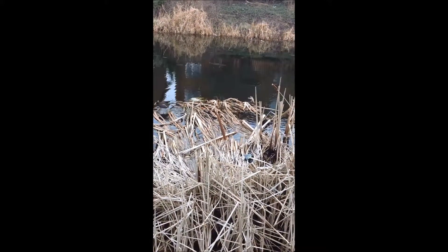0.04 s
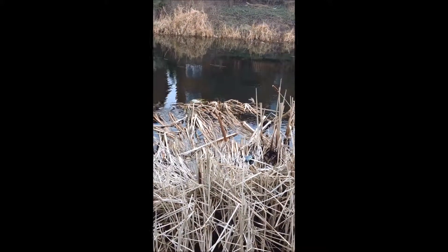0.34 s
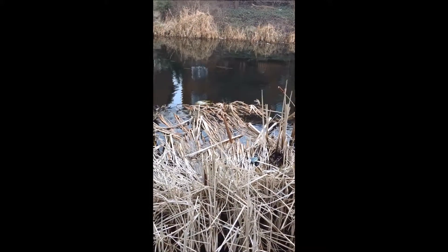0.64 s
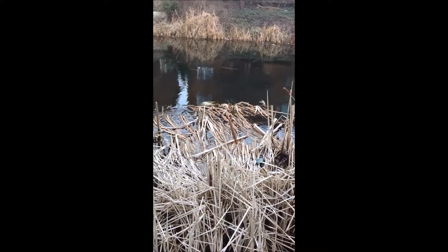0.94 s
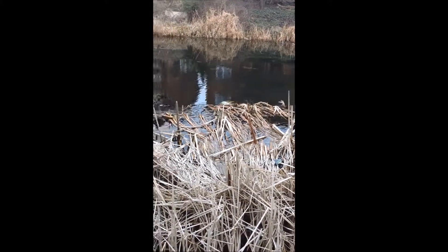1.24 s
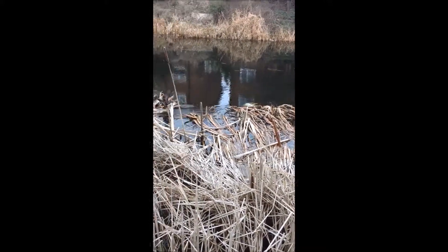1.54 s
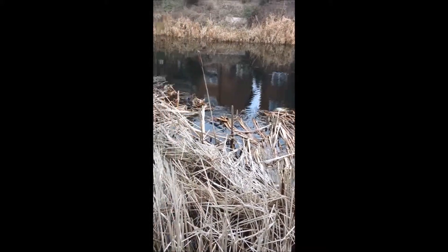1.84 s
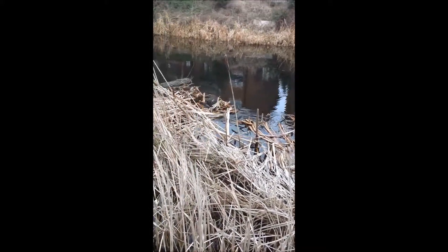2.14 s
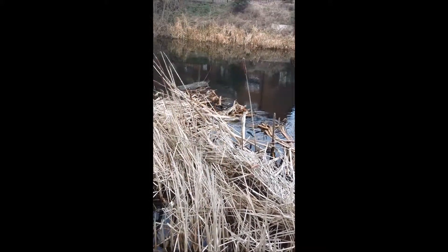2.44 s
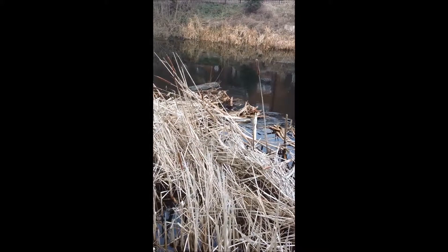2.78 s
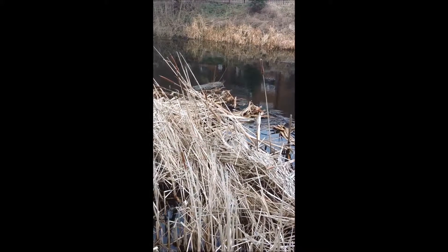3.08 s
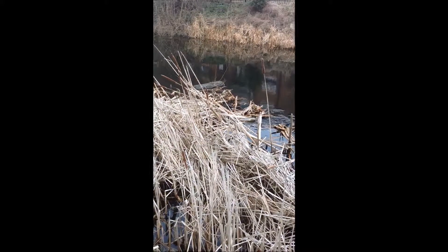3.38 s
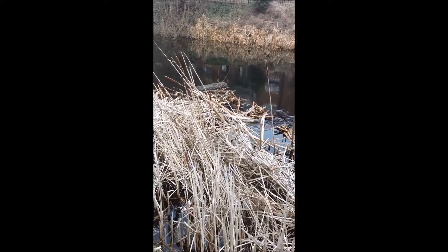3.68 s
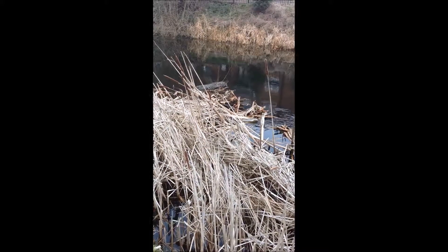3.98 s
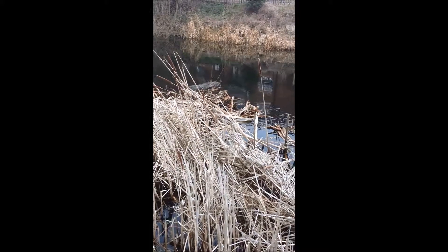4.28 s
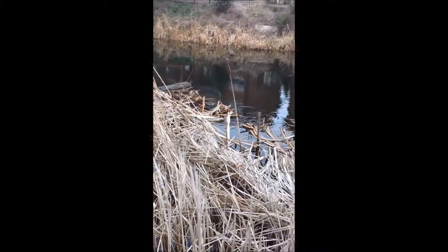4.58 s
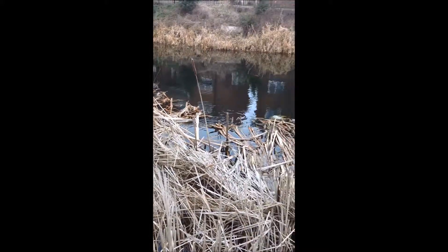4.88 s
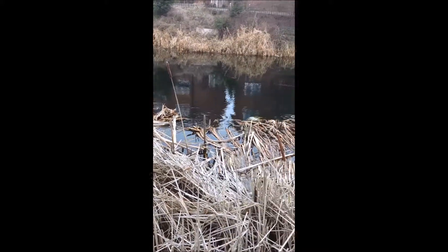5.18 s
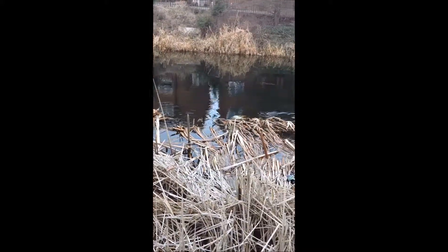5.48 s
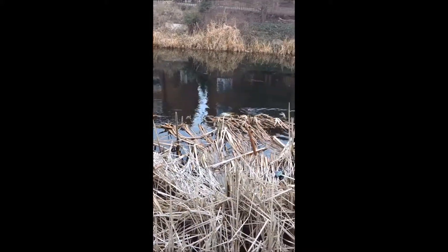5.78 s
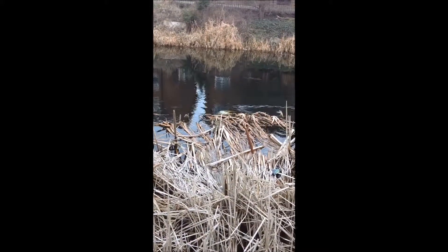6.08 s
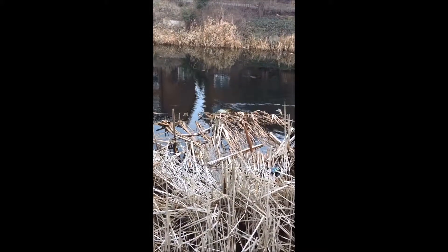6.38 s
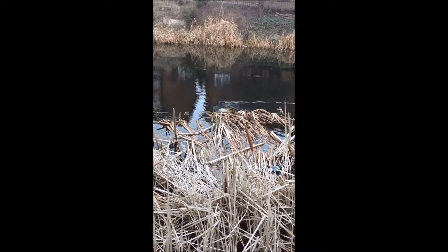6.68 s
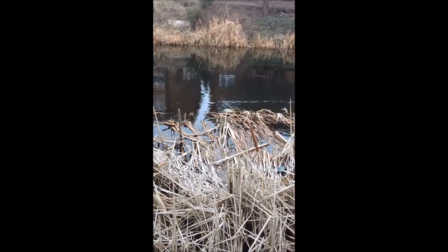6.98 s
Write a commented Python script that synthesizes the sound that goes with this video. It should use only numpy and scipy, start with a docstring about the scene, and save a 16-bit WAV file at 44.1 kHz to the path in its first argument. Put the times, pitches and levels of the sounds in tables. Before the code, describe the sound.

Wind buffets the microphone in low gusts while a small bird repeats a high whistle and other birds twitter faintly.

```python
"""A small bird, probably a tit, repeats a buzzing whistle on the reedy bank of a canal: a frequency-
modulated tone, with a faint high note after it. Songbirds twitter in gliding tones, dry reeds
tick, and a waterbird like a coot clucks three times through its throat resonances; the banks scatter
the calls back. Turbulent gusts buffet the hand-held microphone over the hum of a distant town."""
import sys
import numpy as np
from scipy import signal
from scipy.fft import rfft, irfft
from scipy.io import wavfile
from scipy.ndimage import uniform_filter1d

SR = 44100
rng = np.random.default_rng(int(sys.argv[2]) if len(sys.argv) > 2 else 0)


def store_wav(level_fs):
    """Save 16-bit WAV to argv[1]."""
    pcm = np.round(np.clip(np.atleast_2d(level_fs), -1, 1) * 32767)
    wavfile.write(sys.argv[1], SR, pcm.T.astype(np.int16))


N = 314433
TIME = np.arange(N) / SR


def undb(db):
    """Decibels to amplitude ratio."""
    return 10 ** (np.asarray(db) / 20)


def unit(x):
    """Normalisation to rms 1."""
    return x / np.sqrt(np.mean(x ** 2))


def add(track, start_s, sound):
    """Superposition: a sound sums into a track from start_s on."""
    i = max(int(start_s * SR), 0)
    track[i:i + len(sound)] += sound[:N - i]


def noise(spectrum, size=N):
    """Spectral shaping: noise of rms 1 that follows (frequency_hz, level_db) points."""
    hz, db = np.transpose(spectrum)
    bins_hz = np.maximum(np.fft.rfftfreq(size, 1 / SR), 1)
    gain = undb(np.interp(np.log(bins_hz), np.log(hz), db))
    return unit(irfft(rfft(rng.standard_normal(size)) * gain, size))


def drift(rate_hz, size=N):
    """Linear interpolation of random values: a smooth drift with a spread near 1."""
    hold = int(SR / rate_hz)
    steps = np.repeat(rng.standard_normal(size // hold + 2), hold)
    return uniform_filter1d(steps, hold)[:size] * np.sqrt(3 / 2)


def band(x, low_hz, high_hz, order=2):
    """Butterworth band-pass filtering."""
    return signal.sosfilt(signal.butter(order, [low_hz, high_hz], "band", fs=SR, output="sos"), x)


def phase_of(hz):
    """Phase is the time integral of frequency."""
    return 2 * np.pi * np.cumsum(hz) / SR


def note(length_s, edge):
    """Progress u from 0 to 1, and a raised-cosine envelope whose two ramps each take the share edge."""
    u = np.linspace(0, 1, int(length_s * SR))
    return u, np.sin(np.pi / 2 * np.clip(np.minimum(u, 1 - u) / edge, 0, 1)) ** 2


def whistle(length_s, hz, scoop_hz, buzz_hz=226, buzz_index=0.33, flutter=0.17, waver_hz=9):
    """Frequency modulation: a fast buzz in the syrinx puts sidebands on a tone scooping to its pitch."""
    u, swell = note(length_s, edge=0.33)
    buzz = np.sin(phase_of(buzz_hz * (1 + 0.078 * drift(110, len(u)))))
    pitch_hz = hz - scoop_hz * (1 - u) ** 3 + waver_hz * drift(118, len(u))
    # a note that starts low also starts buzzy, and clears on arrival
    index = buzz_index + scoop_hz / 125 * np.exp(-u / 0.23)
    tone = unit(np.sin(phase_of(pitch_hz) + index * buzz))
    return swell ** 0.47 * (1 + flutter * drift(95, len(u))) * tone


def tit(song_db=-47, echo_db=-14, echo_s=.078, high_after_s=.123, high_ratio=1.282, high_db=-64.5):
    """Multipath propagation: the whistle's direct path fades and swells while its echoes stay even."""
    # the repeated whistle: start_s, length_s, pitch_hz, scoop_from_below_hz, direct_level_db
    whistles = [(0, 0.059, 4140, 61, -48), (0.272, 0.081, 4150, 125, -52.5), (.56, 0.076, 4140, 128, -52),
                (3.836, 0.085, 4200, 21, -45), (4.112, 0.089, 4222, 58, -44),
                (4.389, 0.097, 4200, -7, -41.5), (4.676, .11, 4177, 8, -46), (4.959, 0.1, 4157, 115, -54.5),
                (5.246, .082, 4156, 83, -49.5), (5.511, 0.086, 4160, 142, -46.5),
                (5.789, .1, 4156, 94, -47.5), (6.077, 0.087, 4180, 170, -45.5),
                (6.364, 0.098, 4168, 19, -46)]
    direct, wall_echo, sung, high = np.zeros((4, N))
    for start_s, length_s, hz, scoop_hz, db in whistles:
        tone = whistle(length_s, hz, scoop_hz)
        add(direct, start_s, undb(db) * tone)
        add(sung, start_s, undb(song_db) * tone)
        add(wall_echo, start_s + echo_s, undb(song_db + echo_db) * tone)
        # a thin high note follows the whistle
        u, swell = note(0.055, edge=0.12)
        thin = unit(np.sin(phase_of(high_ratio * hz + 70 * (.5 - u) + 28 * drift(300, len(u)))))
        add(high, start_s + high_after_s, undb(high_db + 1.5 * rng.standard_normal()) * swell * thin)
    scattered = banks(sung, near_db=-10, far_db=-9, t60_s=0.83)
    scattered += banks(high, near_db=-4.5, far_db=0.5, t60_s=0.65)
    return direct + wall_echo + high + scattered


def banks(x, near_db, far_db, t60_s, near_s=0.012):
    """Scattering: near stalks answer at once; trees and walls across the water return a long tail."""
    t = TIME[:SR]
    near, far = rng.standard_normal((2, SR))
    near = near * np.exp(-t / near_s)
    far = far * undb(-60 * t / t60_s) * (1 - np.exp(-t / 0.07))
    response = undb(near_db) * unit(near) + undb(far_db) * unit(far)
    return signal.fftconvolve(x, response / np.sqrt(SR))[:N]


def chirp(length_s, start_hz, middle_hz, end_hz, flutter_db=1.5):
    """Frequency sweep: a nearly pure tone arches through three pitches, weaker on its flanks."""
    u, swell = note(length_s, edge=0.034)
    arch = 1 - np.abs(2 * u - 1) ** 2.6
    pitch_hz = start_hz + (end_hz - start_hz) * u + (middle_hz - (start_hz + end_hz) / 2) * arch
    waver_hz = 16 + .055 * np.ptp(pitch_hz)  # wide slides waver more
    tone = unit(np.sin(phase_of(pitch_hz + waver_hz * drift(300, len(u)))))
    return swell * (0.52 + 0.37 * arch) * undb(flutter_db * drift(150, len(u))) * tone


def chorus(count=170, spread=0.13, droop=.08, direct_db=-6):
    """Reverberant field: random, mostly falling chirps of far birds arrive largely as echoes."""
    # the course of the far chorus: time_s, level_db, centre_pitch_hz
    contour = [(0, -82, 5500), (.75, -61.5, 4840), (1.0, -70.5, 4470), (1.4, -64.5, 5030),
               (2.0, -71.5, 3950), (2.3, -63.5, 3920), (2.7, -75, 4940), (3.3, -78, 4070),
               (3.7, -65.5, 5380), (4.9, -63.5, 4690), (6.4, -82, 4310), (6.8, -67.5, 3370),
               (7.13, -77, 3350)]
    times_s, level_db, centre_hz = np.transpose(contour)
    out = np.zeros(N)
    for k, (offset, stretch, *bends) in enumerate(rng.random((count, 5))):
        start_s = (k + offset) / count * TIME[-1]
        shape = 1 + spread * (2 * np.array(bends) - 1) + droop * np.array([1, 0, -1])
        pitches_hz = np.interp(start_s, times_s, centre_hz) * shape
        gain = undb(np.interp(start_s, times_s, level_db))
        add(out, start_s, gain * chirp(.02 + 0.02 * stretch, *pitches_hz))
    return undb(direct_db) * out + banks(out, near_db=-6.0, far_db=-5.5, t60_s=0.34)


def wind_level(steady_gain_db=1.5, attack_s=.012, release_s=0.0087):
    """Incoherent addition: the powers of steady flow and brief puffs sum to the wind's level in dB."""
    # the steady wind, with one long gust: time_s, level_db
    steady = [(0.0, -42), (0.26, -43), (0.48, -49), (0.71, -51), (1.01, -47), (1.17, -53), (1.41, -51),
              (1.57, -40.5), (1.87, -41), (2.52, -53), (2.8, -42.5), (3.16, -23.5), (3.45, -21.5),
              (3.55, -26), (3.73, -37), (3.93, -38), (4.11, -52.5), (4.31, -48), (4.53, -41), (4.69, -55.5),
              (5.14, -49.5), (6.31, -54), (6.79, -50.5), (7.13, -53.5)]
    # separate puffs on top of it: start_s, length_s, level_db
    puffs = [(0.048, 0.042, -35.5), (.17, 0.04, -26), (0.227, 0.037, -20), (0.289, 0.04, -31.5),
             (.338, 0.038, -25), (0.434, 0.031, -31.5), (0.6, 0.02, -36), (.67, 0.017, -42),
             (0.816, 0.068, -41), (0.922, 0.14, -37), (1.06, 0.076, -31), (1.376, 0.038, -38.5),
             (1.71, 0.063, -41), (1.908, 0.14, -35), (2.183, 0.056, -34), (2.25, 0.08, -44),
             (2.446, 0.17, -35), (2.768, 0.18, -38), (2.919, 0.035, -25.5), (3.565, .08, -21),
             (3.938, 0.077, -27), (4.076, 0.063, -38), (4.3, .1, -28), (4.672, 0.061, -36.5),
             (4.862, 0.17, -46.5), (5.148, .045, -33.5), (5.28, 0.017, -39.5), (5.407, .15, -34),
             (5.675, 0.033, -38), (6.171, 0.044, -42), (6.726, 0.075, -36), (6.866, 0.059, -31)]
    power = undb(np.interp(TIME, *np.transpose(steady)) + steady_gain_db) ** 2
    for start_s, length_s, db in puffs:
        rise = np.clip((TIME - start_s) / attack_s + .5, 0, 1)
        release = np.exp(-np.clip(TIME - start_s - length_s, 0, 1) / release_s)
        power = power + (undb(db) * rise * release) ** 2
    return 10 * np.log10(power)


def wind(gale_from_db=-30, transition_db=2.0):
    """Turbulence: light air only rumbles; a strong gust breaks into smaller, brighter eddies."""
    # spectrum of light air: frequency_hz, level_db
    breeze = [(15, -62.5), (25, -35.5), (38, -37.5), (105, -4.5), (171, 3), (246, -8.5), (450, -31.5),
              (580, -45.5), (990, -120)]
    # spectrum of a strong gust: frequency_hz, level_db
    gale = [(15, -69), (25, -54), (54, -44), (101, -18.5), (139, -2), (189, 4), (257, -1.5), (299, -4),
            (552, -21.5), (584, -24.5), (763, -30), (2400, -81), (3120, -96.5), (5280, -120)]
    gust_db = wind_level()
    gale_share = 1 / (1 + np.exp((gale_from_db - gust_db) / transition_db))
    flow = np.sqrt(1 - gale_share) * noise(breeze) + np.sqrt(gale_share) * band(noise(gale), 55, 800)
    # the gust sets the rms pressure; eddies only flutter around it
    flow = flow * undb(4.0 * drift(70))
    flow = flow / np.sqrt(uniform_filter1d(flow ** 2, int(.05 * SR)))
    return band(flow * undb(gust_db), 45, 3500)


def town(level_db=-56):
    """Broadband background noise: a far-off hum whose level drifts a little."""
    # spectrum of the distant town and the hiss of the air: frequency_hz, level_db
    hum = [(25, -31), (45, -16), (70, -8), (150, -4), (300, 2.5), (480, -4.5), (850, -1), (1300, -8),
           (2000, -15), (2800, -19.5), (5000, -23), (7000, -27.5), (10000, -35.5), (13000, -33),
           (15000, -30)]
    return noise(hum) * undb(level_db + .5 * drift(1.8))


def buffets(thump_gain_db=-2, cycles=0.84, onset_power=1.53, edge_gain_db=9, edge_s=0.0027):
    """Step response: the microphone's bass cut turns each eddy's pressure step into a swing or two."""
    # the hardest eddies: start_s, thump_level_db, nominal_pitch_hz, leading_edge_level_db
    eddies = [(.056, -19.5, 194, -58), (.231, -10.5, 217, -55), (.241, -13.5, 283, -53),
              (.351, -19, 180, -36), (0.996, -22, 157, -66), (1.525, -22.5, 188, -59),
              (2.982, -24.5, 210, -46), (3.007, -11.5, 238, -38), (3.025, -8, 226, -40),
              (3.054, -11.5, 201, -35.5), (3.082, -19, 155, -41.5), (3.136, -6, 236, -44),
              (3.216, -22, 240, -48), (3.267, -10.5, 337, -29), (3.28, -9.5, 209, -25.5),
              (3.29, -13, 240, -24.5), (3.352, -13, 260, -33), (3.381, -11.5, 160, -31.5),
              (3.426, -8.5, 220, -35.5), (3.438, -8.5, 240, -34), (3.476, -12, 280, -31),
              (3.518, -9.5, 185, -52), (3.568, -13, 175, -30.5), (3.583, -9.5, 213, -40),
              (3.631, -19, 206, -43), (3.642, -4.5, 225, -43), (3.678, -16, 155, -46.5),
              (3.746, -18, 293, -42), (3.756, -15, 180, -46), (3.957, -16.5, 170, -45),
              (3.988, -30, 215, -38.5), (4.311, -18.5, 266, -62), (4.384, -16, 174, -47),
              (5.515, -16.5, 168, -58), (5.63, -23.5, 180, -67), (6.002, -28, 230, -58),
              (6.287, -28.5, 175, -48.5), (6.544, -18, 173, -53), (6.873, -19, 263, -50),
              (6.903, -13.5, 206, -54)]
    thumps, edges = np.zeros((2, N))
    t = TIME[:2048]
    for start_s, thump_db, hz, edge_db in eddies:
        age = t * hz / cycles
        pitch_hz = hz * (0.77 + 0.86 * np.exp(-age))  # the swing slows as the eddy passes
        swing = age ** onset_power * np.exp(-2 * age) * np.sin(phase_of(pitch_hz))
        add(thumps, start_s, undb(thump_db + thump_gain_db) * swing / np.abs(swing).max())
        edge = band(rng.standard_normal(len(t)) * t * np.exp(-t / edge_s), 350, 685)
        add(edges, start_s, undb(edge_db + edge_gain_db) * edge / np.abs(edge).max())
    return band(thumps, 79, 680) + band(edges, 190, 1250, order=3)


def reeds(decay_s=0.0012, snap_db=-6, scrape_db=-23, scrape_s=0.019):
    """Friction and sudden release: dry stalks scrape as they bend and snap in a heavily damped burst."""
    # dry reeds ticking: time_s, level_db, relative_treble_db
    ticks = [(0.089, -61, 7.5), (0.4294, -62, 1), (1.5256, -40.5, -5), (1.529, -58, -7), (1.623, -45, -16),
             (1.653, -44.5, -6), (1.735, -38.5, -32), (1.7534, -48, -16), (1.7777, -42, -9.5),
             (1.831, -51, 0), (5.092, -43.5, -13), (6.676, -41, -22)]
    # spectrum of a tick: frequency_hz, level_db
    tick_spectrum = [(590, -32), (1000, -1), (1270, -1), (2500, 2), (5470, -13), (5920, -15), (7770, -10.5),
                     (15000, -49)]
    out, t = np.zeros(N), TIME[:4096]
    lead_s = t[-1] / 2
    age = np.maximum(t - lead_s, 0) / decay_s
    snap = undb(snap_db) * age * np.exp(-age)
    for time_s, db, treble_db in ticks:
        body = noise(tick_spectrum, size=len(t))
        treble = undb(treble_db) * unit(band(rng.standard_normal(len(t)), 5000, 13000))
        scrape = undb(scrape_db + 4.3 * drift(300, len(t))) * np.exp(-((t - lead_s) / scrape_s) ** 2)
        add(out, time_s - lead_s, undb(db) * (body + treble) * (snap + scrape))
    return out


def songbirds(run_start_s=5.455, run_step_s=0.049, run_note_s=.047, run_db=-61.5, trill_hz=120):
    """Frequency modulation: songbirds glide in pitch for slurs, and shake it unevenly for trills."""
    # falling slurs, rising slurs and arched chirps: start_s, length_s, nominal_pitch_hz, level_db
    falls = [(.715, 0.042, 5800, -65), (.805, 0.015, 4480, -62), (.961, 0.023, 4330, -61.5),
             (1.16, 0.019, 4330, -63.5), (1.835, 0.024, 4940, -60), (2.125, .025, 5320, -63),
             (2.512, 0.017, 4980, -63), (2.674, .024, 3950, -65.5), (2.779, 0.025, 3830, -63.5),
             (3.101, 0.018, 4620, -63.5), (3.472, .021, 5500, -59), (3.515, 0.029, 5560, -53.5),
             (3.602, 0.062, 5850, -54), (3.916, .02, 3650, -61.5), (4.609, .022, 3920, -65)]
    rises = [(.786, .04, 3900, -62.5), (2.197, 0.026, 4030, -60.5), (2.892, 0.03, 3520, -55),
             (3.893, 0.07, 4050, -57), (4.356, 0.03, 4370, -57.5), (4.423, 0.03, 3100, -62),
             (5.503, .04, 3800, -57)]
    arches = [(.689, 0.053, 5200, -70), (1.311, 0.048, 4960, -63), (2.08, .07, 4970, -62.5),
              (2.821, 0.06, 5600, -57.5), (2.918, .041, 4880, -57), (3.009, 0.048, 4910, -52),
              (5.411, .062, 4960, -55.5), (5.982, 0.064, 5000, -53), (6.1, .025, 5400, -58)]
    # held notes, including the soft first whistle of the tit's long series at 3.55 s:
    # start_s, length_s, start_hz, end_hz, level_db
    held = [(0.391, 0.068, 5020, 4800, -59), (0.557, 0.036, 6080, 5720, -65.5),
            (1.045, .085, 5900, 6400, -68.5), (1.205, 0.055, 6330, 6100, -66),
            (1.541, 0.057, 5570, 5070, -57), (1.606, 0.06, 5060, 4640, -65),
            (2.568, 0.049, 5300, 4620, -65), (2.679, .075, 5150, 5000, -66.5),
            (3.166, 0.051, 4780, 4320, -57), (3.204, .2, 4420, 4380, -62.5),
            (3.551, .093, 4200, 4220, -57.5), (3.704, .11, 6730, 6110, -53.5),
            (4.672, 0.042, 2490, 2250, -58), (5.012, 0.042, 1973, 1970, -60),
            (5.336, 0.076, 2245, 1950, -60.5)]
    # the dipping note of one low run: start_hz, bottom_hz, end_hz
    run_dip = (3400, 2330, 3500)
    # buzzy calls: start_s, length_s, start_hz, end_hz, depth_hz, level_db
    trills = [(0.699, 0.054, 5100, 4900, 420, -59.5), (2.913, 0.041, 4620, 5120, 381, -56),
              (4.005, 0.051, 4200, 4410, 169, -57), (4.056, 0.1, 4820, 4850, 110, -61.5),
              (4.141, 0.15, 4820, 4770, 119, -59)]
    # start, middle and end of a syllable, as ratios to its nominal pitch
    fall_shape, rise_shape, arch_shape = (0.96, .9, .78), (0.99, 1.14, 1.33), (0.71, 0.97, .79)
    out = np.zeros(N)
    for syllables, shape in (falls, fall_shape), (rises, rise_shape), (arches, arch_shape):
        for start_s, length_s, hz, db in syllables:
            add(out, start_s, undb(db) * chirp(length_s, *hz * np.array(shape)))
    for start_s, length_s, start_hz, end_hz, db in held:
        add(out, start_s, undb(db) * chirp(length_s, start_hz, (start_hz + end_hz) / 2, end_hz))
    for k in range(4):
        add(out, run_start_s + k * run_step_s, undb(run_db) * chirp(run_note_s, *run_dip))
    for start_s, length_s, start_hz, end_hz, depth_hz, db in trills:
        u, swell = note(length_s, edge=0.16)
        shake_hz = trill_hz * (1 + 0.26 * drift(150, len(u)))
        shake = np.sin(phase_of(shake_hz)) + 0.46 * drift(400, len(u))
        pitch_hz = start_hz + (end_hz - start_hz) * u + depth_hz * shake
        add(out, start_s, undb(db) * swell * unit(np.sin(phase_of(pitch_hz))))
    return out + banks(out, near_db=-7.5, far_db=-7.0, t60_s=0.64)


def coot(fall=0.085, jitter=0.042):
    """Source and filter: throat resonances shape falling, slightly hoarse harmonics into clucks."""
    # the clucks: start_s, length_s, pitch_hz, level_db, overtone_gain_db
    clucks = [(4.058, 0.034, 705, -49, -10), (4.369, 0.039, 719, -48.5, -7.5),
              (4.722, 0.0314, 720, -46, -3)]
    # resonances of the throat: centre_hz, width_hz, gain_db
    formants = [(720, 310, 1), (2270, 460, 2), (2920, 350, -16)]
    out = np.zeros(N)
    for start_s, length_s, hz, db, overtone_db in clucks:
        u, swell = note(length_s, edge=0.19)
        phase = phase_of(hz * (1 + fall * (.5 - u) + jitter * drift(760, len(u))))
        voice = 0
        for k in range(1, 6):
            throat = sum(undb(gain_db) / np.hypot(1, 2 * (k * hz - centre_hz) / width_hz)
                         for centre_hz, width_hz, gain_db in formants)
            voice = voice + throat * undb(overtone_db * (k > 1)) * np.sin(k * phase)
        add(out, start_s, undb(db) * swell * unit(voice))
    return out + banks(out, near_db=-4.5, far_db=-9.5, t60_s=0.9)


def scene():
    """Superposition: birds, reeds, wind and town sum at one microphone."""
    waterside = coot() + reeds()
    return (tit() + songbirds() + chorus() + waterside + wind() + buffets() + town())[None]


def record(dry):
    """Band limiting: a steep low-pass filter cuts the highest treble."""
    top_hz = 15350
    return signal.sosfilt(signal.ellip(10, .2, 80, top_hz, fs=SR, output="sos"), dry)


dry = scene()
out = record(dry)
store_wav(out)
```